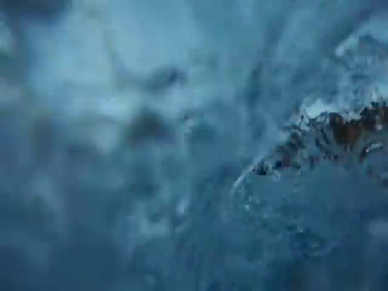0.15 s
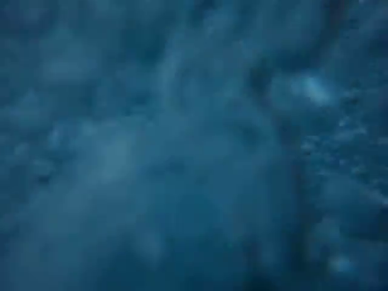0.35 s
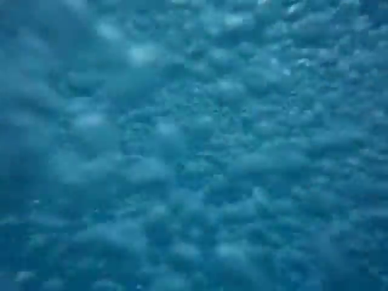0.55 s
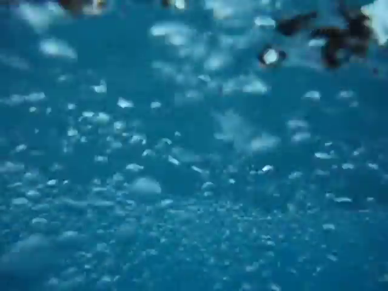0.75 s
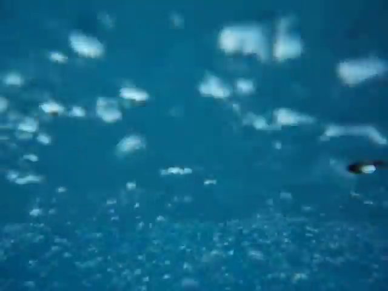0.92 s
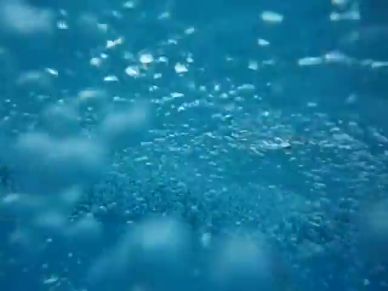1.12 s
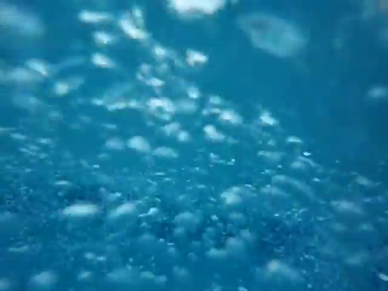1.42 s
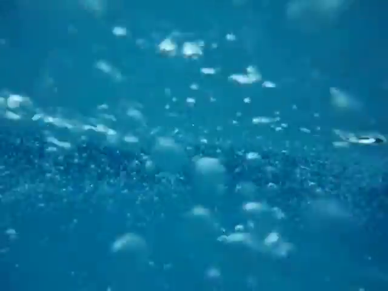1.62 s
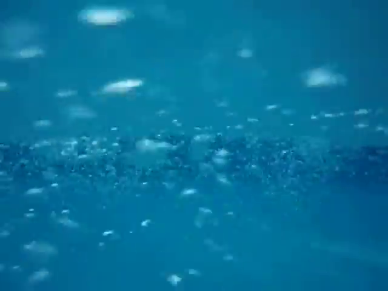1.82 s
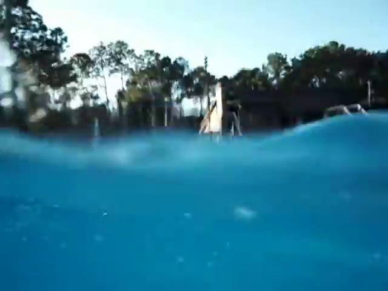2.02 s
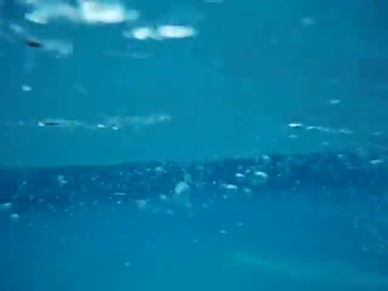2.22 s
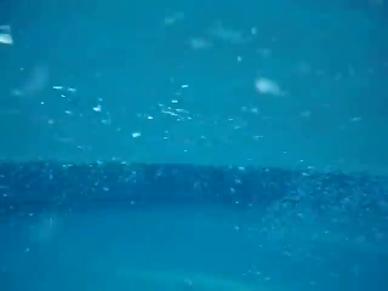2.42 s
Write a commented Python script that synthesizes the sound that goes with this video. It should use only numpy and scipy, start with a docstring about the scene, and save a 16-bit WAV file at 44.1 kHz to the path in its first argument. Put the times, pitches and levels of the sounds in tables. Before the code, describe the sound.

A heavy splash heard going under in a pool, followed by dull bubbling and plips.

```python
"""A waterproof camera plunges into a swimming pool. Spray patters down, then the surface slams over
the microphone and overloads it. Under water a cloud of trapped air gurgles, rising in pitch, while
small bubbles churn and the current buffets the housing. Near the surface again, single bubbles
plip and pop right at the microphone, each ringing briefly as it pinches off."""
import sys
import numpy as np
from scipy import signal
from scipy.fft import rfft, irfft
from scipy.io import wavfile
from scipy.ndimage import uniform_filter1d

SR = 44100
rng = np.random.default_rng(int(sys.argv[2]) if len(sys.argv) > 2 else 0)


def pcm_store(signal):
    """Save signal as 16-bit PCM."""
    levels = np.round(np.clip(np.atleast_2d(signal), -1, 1) * 32767)
    wavfile.write(sys.argv[1], SR, levels.astype(np.int16).T)


N = 112454


def from_db(db):
    return 10 ** (np.asarray(db) / 20)


def unit_rms(x):
    return x / np.sqrt(np.mean(x ** 2) + 1e-20)


def curves(rows):
    """Columns after the first (time), interpolated to every sample."""
    times_s, *columns = np.transpose(rows)
    return [np.interp(np.arange(N) / SR, times_s, column) for column in columns]


def add(out, start_s, x):
    i = int(start_s * SR)
    out[i:i + len(x)] += x[:N - i]


def gain_at(spectrum, hz):
    points_hz, db = np.transpose(spectrum)
    return from_db(np.interp(np.log(hz), np.log(points_hz), db))


def noise(spectrum):
    """Shaped noise, rolled off beyond the spectrum's ends; rms 1."""
    hz = np.arange(1, N // 2 + 2) * SR / N
    rolloff = np.minimum(hz / spectrum[0][0], 1) ** 2 * np.minimum(spectrum[-1][0] / hz, 1) ** 2
    return unit_rms(irfft(rfft(rng.standard_normal(N)) * gain_at(spectrum, hz) * rolloff, N))


def drift(rate_hz):
    """Slow random motion; rms 1."""
    pole = np.exp(-2 * np.pi * rate_hz / SR)
    return unit_rms(signal.lfilter([1], [1, -2 * pole, pole * pole], rng.standard_normal(N + SR))[SR:])


def levelled(x, span_s):
    """Hold the running rms at 1."""
    return x / np.sqrt(uniform_filter1d(x ** 2, max(int(span_s * SR), 2)) + 1e-6)


def burst(decay_s):
    """Short decaying noise."""
    t = np.arange(SR // 20) / SR
    return rng.standard_normal(len(t)) * np.exp(-t / decay_s)


def soft_clip(x, ceiling, hardness):
    return x / (1 + (x / ceiling) ** hardness) ** (1 / hardness)


def swarm(spectrum, per_s, t60_cycles, spread_db, sizes=80):
    """Random bubbles, one click-driven resonator per size; rms 1."""
    out = np.zeros(N)
    for hz in np.geomspace(spectrum[0][0], spectrum[-1][0], sizes):
        wait, strength, sign = rng.random((N // 200, 3)).T
        onsets = (np.cumsum(-np.log(wait)) * SR * sizes / per_s).astype(int)
        heights = np.sign(sign - .5) * from_db(spread_db * np.minimum(-np.log(strength), np.pi))
        clicks = np.full(N, 1e-18)
        clicks[onsets[onsets < N]] = heights[onsets < N]
        radius, angle = from_db(-60 * hz / (t60_cycles * SR)), 2 * np.pi * hz / SR
        rings = signal.lfilter([1, -1], [1, -2 * radius * np.cos(angle), radius * radius], clicks)
        out += gain_at(spectrum, hz) * hz * rings
    return levelled(unit_rms(out), span_s=0.039)


def buffeting():
    """Water on the housing: heaving pressure, small eddies, gulps that suck and slaps that push."""
    # heave: (time [s], level [dB])
    heave_levels = [(0, -31.5), (.19, -23.5), (.225, -9), (.28, -9.5), (.35, -9.5), (.4, -20.5),
                    (.48, -37.5), (.7, -37), (.8, -41), (1.21, -35), (1.28, -29), (1.4, -29), (1.62, -41),
                    (2.03, -30), (2.55, -39.5)]
    # heave and eddy spectra: (frequency [Hz], level [dB])
    heave_spectrum = [(15, 5), (35, -4.5), (70, -10), (140, -24.5), (600, -57.5)]
    eddy_spectrum = [(110, 1.5), (200, -2.5), (600, -27.5)]
    # pressure pulses: (time [s], level [dB], half width [s])
    gulps = [(0.215, -3.5, 0.0029), (.261, 5.5, 0.002), (.275, 0, 0.00041), (.303, -10, 0.0028),
             (0.321, -2.5, 0.0013), (.367, -2.5, 0.00084), (0.679, -20, 0.0016), (2.2625, -8, 0.00035),
             (2.2775, -5, 0.00069)]
    slaps = [(.035, -15, 0.0015), (.268, 9.5, 0.0019), (.281, 7, 0.003), (.329, 0.5, 0.0042)]
    heave_db, = curves(heave_levels)
    eddy_db = 1.29 * heave_db - 4  # eddies grow faster than the heave
    out = from_db(heave_db + 2.45 * drift(33)) * levelled(noise(heave_spectrum), span_s=0.033)
    out += from_db(eddy_db + 4.75 * drift(15)) * noise(eddy_spectrum)
    t = np.arange(N) / SR
    for pulses, polarity in ((gulps, -1), (slaps, 1)):
        for centre_s, db, width_s in pulses:
            widths = np.clip((t - centre_s) / width_s, -20, 20)
            rebound = .28 * np.exp(-(widths / 4 - 1) ** 2)
            out += polarity * from_db(db) * (1 / np.cosh(widths) - rebound)
    return out


def close_bubbles():
    """Each bubble snaps off, drops onto its pitch as it rounds off and rings down, wobbling."""
    # single bubbles: (time [s], pitch [Hz], level [dB], t60 [s])
    bubbles = [(0.1633, 3560, -3, 0.0024), (0.3568, 3750, -6.5, 0.0065), (0.3948, 1850, -19, 0.01),
               (.467, 2700, -20.5, 0.0044), (.543, 1250, -21, 0.0085), (0.7437, 3300, -29, 0.004),
               (1.1447, 2300, -36, 0.014), (1.171, 4300, -37, 0.0088), (1.337, 1014, -20.5, 0.013),
               (1.366, 4282, -29.5, 0.013), (1.4044, 2290, -16.5, 0.0046), (1.407, 4550, -28, 0.014),
               (1.622, 1010, -24, 0.058), (1.684, 940, -26, 0.045), (1.781, 940, -21, 0.018),
               (1.8894, 1150, -26, .032), (1.9895, 737, -13, 0.02), (2.022, 490, -17.5, 0.02),
               (2.0337, 935, -16.5, 0.015), (2.0354, 1884, -25, 0.037), (2.063, 1597, -15.5, 0.024),
               (2.061, 2470, -18, 0.0074), (2.075, 1560, -15, 0.016), (2.0742, 4200, -21, 0.0083),
               (2.104, 2550, -23.5, 0.011), (2.121, 3500, -23, 0.009), (2.206, 1620, -23, 0.019),
               (2.2218, 1250, -18.5, 0.0088), (2.2523, 1110, -2, 0.012), (2.2527, 1740, -9.5, 0.017),
               (2.256, 784, -11, 0.02), (2.2972, 1156, -6, 0.016), (2.297, 2650, -7.5, 0.0054),
               (2.303, 1160, -8.5, 0.01), (2.3243, 2100, -12, 0.0043), (2.3426, 1150, -14, 0.009),
               (2.3424, 2270, -15, 0.0082), (2.396, 1250, -17.5, 0.011), (2.396, 2743, -21.5, 0.021),
               (2.4322, 1260, -27.5, 0.0083), (2.4873, 1173, -29, 0.034), (2.519, 590, -27, 0.1)]
    onset_cycles, settle_cycles, wobble_cycles = 0.13, 2.3, 7
    out, t = np.zeros(N), np.arange(SR // 5) / SR
    for start_s, hz, db, t60_s in bubbles:
        wobble = .02 * np.sin(2 * np.pi * (hz * t / wobble_cycles + rng.random()))
        sharpening = 0.12 * np.exp(-hz * t / settle_cycles)
        cycles = np.cumsum(hz * (1 + sharpening + wobble)) / SR
        swell = 1 - np.exp(-cycles / onset_cycles)
        decay = from_db(-60 * (t / t60_s) ** 1.25)
        ring = swell * decay * np.sin(2 * np.pi * cycles)
        add(out, start_s, from_db(db) * ring)
        # Echoes off surface and foam blur the fainter, farther bubbles most.
        reflections = burst(decay_s=0.0025)
        echoes = signal.fftconvolve(ring, reflections / np.linalg.norm(reflections))
        add(out, start_s, from_db(0.62 * db - 12.5) * echoes)
        snap = burst(decay_s=0.0003)
        add(out, start_s, from_db(db - 24.5) * snap)
    return out


def spray():
    """Droplets and foam: fine grains in a hiss, breaking into ragged sheets when strongest."""
    # spray in air and as the surface closes: (time [s], level [dB])
    levels = [(0, -41), (.12, -35.5), (.16, -28), (.206, -31.5), (.214, -11), (.229, -4), (.24, -14.5),
              (.255, -17.5), (.34, -27.5), (.368, -34.5), (.385, -51), (.403, -30), (.425, -57)]
    # spray spectrum: (frequency [Hz], level [dB])
    spectrum = [(500, -9), (1200, -1), (3800, 0), (5800, -5.5)]
    db, = curves(levels)
    force = (db - db.min()) / np.ptp(db)
    grains = swarm(spectrum, per_s=4500, t60_cycles=16, spread_db=4)
    ragged_db = 3 * force ** 2 * drift(140)
    return from_db(db + ragged_db) * unit_rms(grains + from_db(-2) * noise(spectrum))


def air_cloud():
    """Trapped air throbs in uneven glugs; the pitch dips, then climbs as the cloud breaks up."""
    # cloud resonance: (time [s], pitch [Hz], level [dB])
    resonance = [(0, 260, -43), (.19, 230.8, -43), (.29, 150.5, -13), (.42, 224.9, -37), (.57, 258, -33.5),
                 (.75, 268.4, -39), (.82, 311.7, -43), (1, 410.7, -54), (2.15, 519.7, -43),
                 (2.47, 522.5, -47), (2.55, 420.6, -32.5)]
    hz, db = curves(resonance)
    phase = 2 * np.pi * np.cumsum(hz) / SR
    cloud, small_pockets = (drift(38) * np.cos(p) + drift(50) * np.sin(p) for p in (phase, 1.7 * phase))
    gurgle = levelled(cloud + from_db(-11.5) * small_pockets, span_s=0.16)
    return from_db(db + 4.6 * drift(19)) * gurgle


def small_bubbles():
    """A crowd of small bubbles churns; the tiniest burst in a dry fizz."""
    # churn and fizz: (time [s], level [dB])
    churn_levels = [(0, -69), (.205, -43), (.216, -17.5), (.245, -12.5), (.3, -25.5), (.375, -30.5),
                    (.42, -38.5), (.6, -48), (1.12, -48), (1.23, -40.5), (1.34, -37), (1.55, -43.5),
                    (1.97, -45.5), (2.09, -39.5), (2.18, -34), (2.24, -43.5), (2.34, -35), (2.45, -66),
                    (2.55, -38)]
    fizz_levels = [(.4, -60), (.6, -67), (1.1, -62), (1.38, -41), (1.53, -79), (1.95, -72.5), (2.12, -53),
                   (2.45, -72)]
    # their spectra: (frequency [Hz], level [dB])
    churn_spectrum = [(250, 1.5), (450, -3.5), (700, 2), (1050, -2), (1400, -11.5), (2800, -38.5)]
    fizz_spectrum = [(1300, 3), (2300, 17.5), (3500, -9.5), (4600, 12.5), (5600, -8.5)]
    churn_db, = curves(churn_levels)
    fizz_db, = curves(fizz_levels)
    fizz = swarm(fizz_spectrum, per_s=500, t60_cycles=20, spread_db=10)
    churn = swarm(churn_spectrum, per_s=1500, t60_cycles=20, spread_db=5)
    return from_db(churn_db) * churn + from_db(fizz_db) * fizz


def film_ticks():
    """Thin films burst with a pitchless tick."""
    # bursting films: (time [s], level [dB])
    ticks = [(0.2733, 0), (0.6652, -27), (0.935, -28.5), (1.328, -27), (1.366, -19), (1.827, -28.5),
             (2.1517, -24), (2.3239, -17), (2.374, -18.5)]
    lowpass = signal.butter(2, 3960, fs=SR, output="sos")
    out = np.zeros(N)
    for start_s, db in ticks:
        add(out, start_s, from_db(db) * signal.sosfilt(lowpass, burst(decay_s=0.0023)))
    return out


def hiss():
    """Faint, steady, dull noise floor."""
    # floor spectrum: (frequency [Hz], level [dB])
    spectrum = [(100, 22), (700, 9), (5000, 0)]
    return from_db(-55.5) * noise(spectrum)


def scene():
    """All water sounds over the hiss; mono."""
    water = buffeting() + spray() + small_bubbles() + air_cloud() + close_bubbles() + film_ticks()
    return (water + hiss())[None]


def record(dry):
    """The microphone overloads; the camera cuts the treble to a weak skirt and clips peaks again."""
    edge_hz, skirt_hz, cutoff_hz = 5300, (5500, 5950), 16000
    overloaded = soft_clip(dry, ceiling=0.74, hardness=6)
    narrow = signal.sosfilt(signal.cheby1(10, .3, edge_hz, fs=SR, output="sos"), overloaded)
    skirt = signal.sosfilt(signal.butter(4, skirt_hz, "band", fs=SR, output="sos"), overloaded)
    clipped = soft_clip(narrow + from_db(-14.5) * skirt, ceiling=0.82, hardness=24)
    return signal.sosfilt(signal.cheby2(20, 60, cutoff_hz, fs=SR, output="sos"), clipped)


dry = scene()
out = record(dry)
pcm_store(out)
```